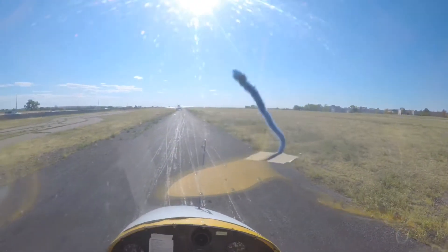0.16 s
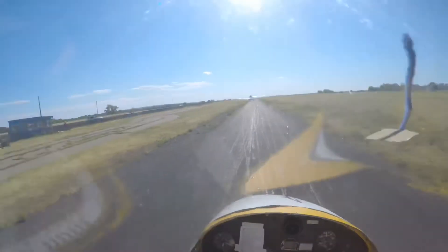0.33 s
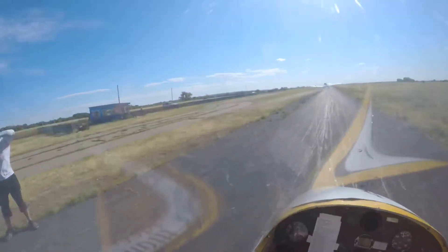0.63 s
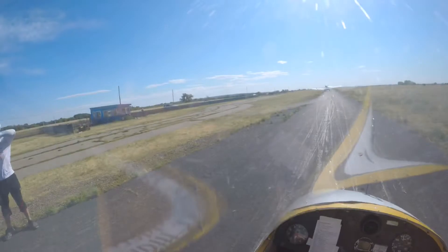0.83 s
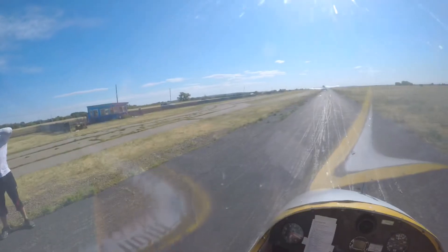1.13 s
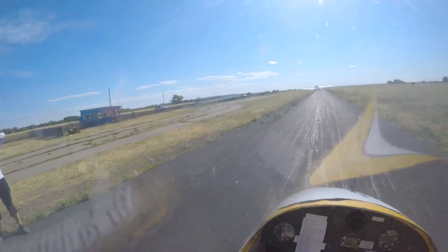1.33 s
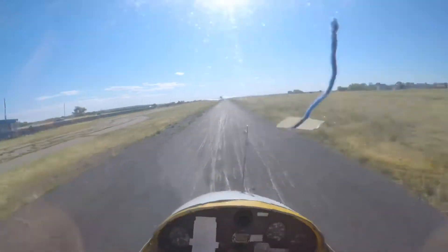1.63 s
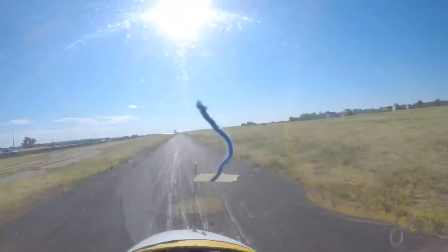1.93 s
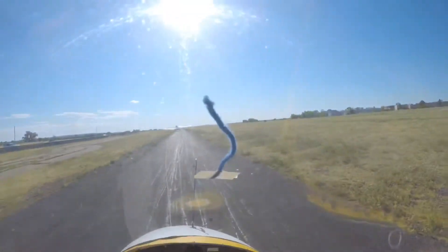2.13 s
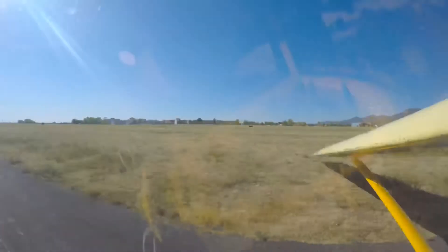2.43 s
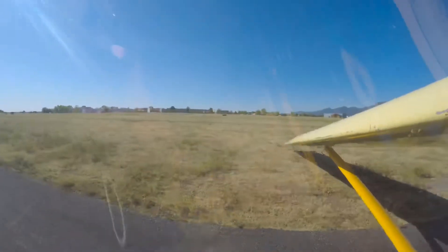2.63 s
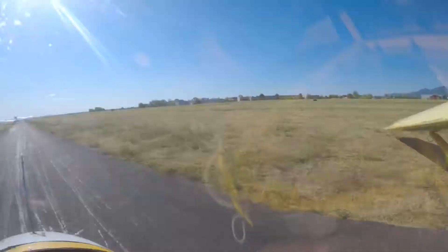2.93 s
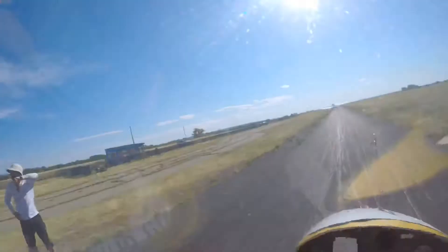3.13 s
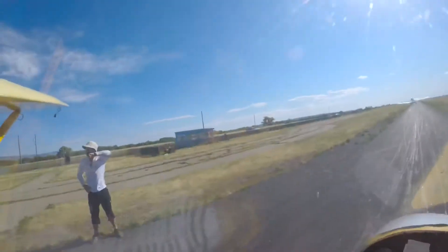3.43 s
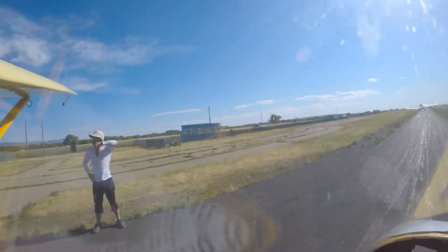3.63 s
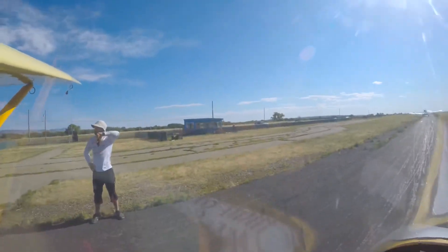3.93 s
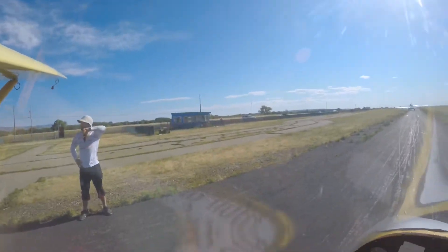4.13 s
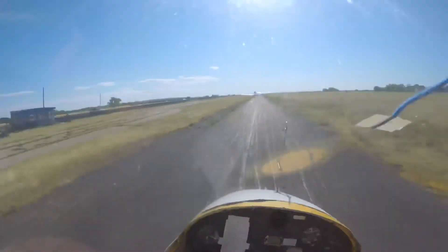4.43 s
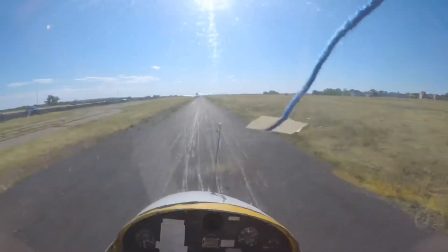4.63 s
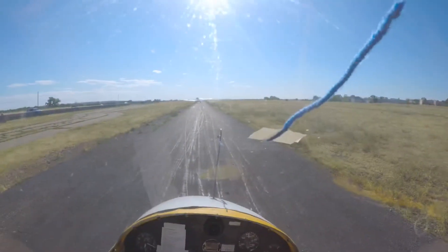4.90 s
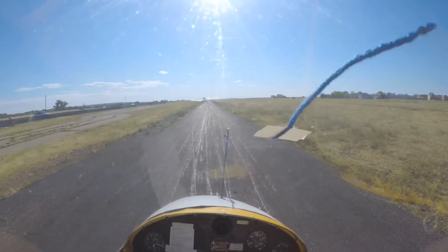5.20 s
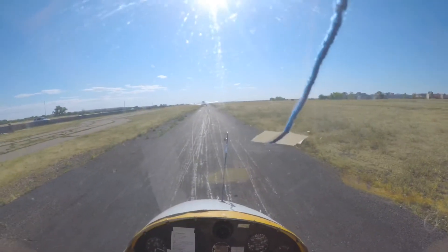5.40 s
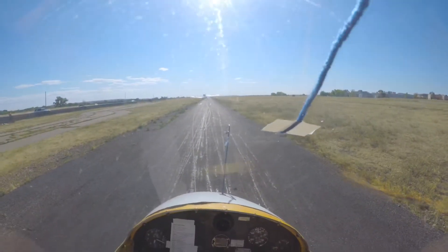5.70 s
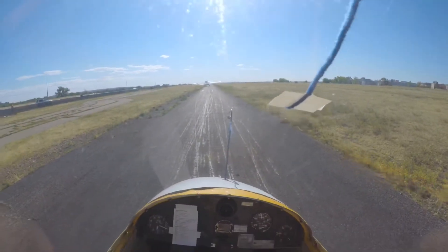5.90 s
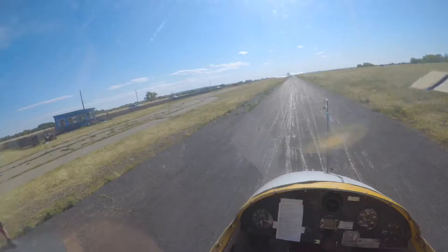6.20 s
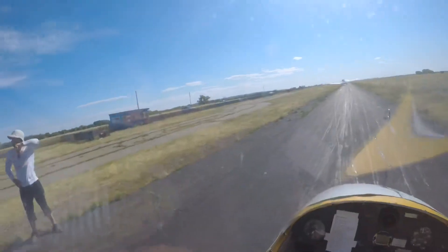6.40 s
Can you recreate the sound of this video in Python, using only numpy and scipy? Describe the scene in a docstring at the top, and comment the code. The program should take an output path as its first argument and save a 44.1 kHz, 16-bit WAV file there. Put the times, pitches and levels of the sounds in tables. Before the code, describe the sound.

Inside a light glider's cabin as it rolls along a runway, close and dry. Throughout, a deep uneven rumble sways below a wavering drone near 53 Hz that throbs three or four times a second, with very faint air hiss and tiny fittings chattering. Small hollow rattles at 0.45-0.55 s lead into a heavy booming knock at 0.6 s, with a rough swish after it. Rattles cluster from 1.1 s; at 1.4 s a metal fitting clanks and bounces briefly, with a short hiss. Scattered woody rattles follow between 1.55 and 3.6 s. At 3.8 s quick touches become the hardest, brightest slam; loose metal jangles for a moment and grainy, sliding hiss trails until about 4.6 s. Double rattles come at 4.65 s, then frequent hollow clatters from 5.25 to 6.4 s as the rumble continues to the end.

```python
"""Inside the cockpit of a light glider as it starts to roll along a runway.
Throughout: filtered-noise rumble, a throbbing drone, faint hiss of air, and rattles of tiny contacts.
At 0.6 s a heavy knock (clicks, buzz, decaying modes); at 1.4 s a metal fitting clanks and bounces.
At 3.8 s the hardest knock, after which a loose metal part jangles.
Grainy swishes of hiss come and go, some around the hard knocks; noise through moving resonances glides."""
import sys
import numpy as np
from scipy import signal
from scipy.fft import rfft, irfft
from scipy.io import wavfile
from scipy.ndimage import uniform_filter1d

SR = 44100
rng = np.random.default_rng(int(sys.argv[2]) if len(sys.argv) > 2 else 0)


def transcribe(u):
    """Save the signal u as a 16-bit wav file named by the first command-line argument.

    u: samples, shape (n,) or (channels, n), limited to [-1, 1]; the rate is SR.
    q: integer samples, one column per channel.
    """
    v = np.clip(np.atleast_2d(u).T, -1, 1)
    q = np.round(v * 32767).astype(np.int16)
    wavfile.write(sys.argv[1], SR, q)


N = 288855
TIME = np.arange(N) / SR


def gain_of(db):
    """Decibels to amplitude."""
    return 10 ** (np.asarray(db) / 20)


def evened(x):
    """Scales to rms 1."""
    return x / np.sqrt(np.mean(x ** 2) + 1e-20)


def levelled(x, size=600):
    """Scales a burst so that its loudest stretch of size samples has rms 1."""
    return x / np.sqrt(uniform_filter1d(x ** 2, size).max() + 1e-20)


def read(points, hz):
    """Reads a spectrum on a log-frequency axis."""
    f, value = np.transpose(points)
    return np.interp(np.log(hz + 1), np.log(f + 1), value)


def add(mix, s, sound):
    """Mixes a sound in at s seconds."""
    part = mix[max(round(s * SR), 0):][:len(sound)]
    part += sound[:len(part)]


def band(x, lo_hz, hi_hz, order=3):
    """Causal band-pass."""
    sos = signal.butter(order, [lo_hz, min(hi_hz, SR / 2 - 1)], "band", fs=SR, output="sos")
    return signal.sosfilt(sos, x)


def noise(spectrum):
    """Noise of rms 1 with the given spectrum."""
    gain = gain_of(read(spectrum, np.fft.rfftfreq(N, 1 / SR)))
    return evened(irfft(rfft(rng.standard_normal(N)) * gain, N))


def drift(rate_hz):
    """Random drift of rms 1: noise under a Gaussian low-pass."""
    gain = np.exp(-(np.fft.rfftfreq(N, 1 / SR) / rate_hz) ** 2)
    return evened(irfft(rfft(rng.standard_normal(N)) * gain, N))


def decay(t, t60):
    """Exponential decay by 60 dB in t60 seconds."""
    return np.exp(-np.log(1000) * t / t60)


def ringing(modes, pitch=1, size=22050):
    """A struck part rings as a sum of decaying sine modes."""
    t = np.arange(size) / SR
    return sum(gain_of(db) * decay(t, t60) * np.sin(2 * np.pi * pitch * hz * t) for hz, db, t60 in modes)


def resonate(x, hz, width_hz):
    """A resonance of gain 1 that can follow a moving frequency."""
    turn = np.exp(2j * np.pi * np.cumsum(hz * np.ones(len(x))) / SR)
    r = np.exp(-np.pi * width_hz / SR)
    # shift down to 0 Hz, one-pole low-pass, shift back up
    return 2 * (turn * signal.lfilter([1 - r], [1, -r], x / turn + 1e-18)).real


def shower(per_s, rise_s, t60):
    """Tiny contacts of random sign that build up and die away."""
    t = np.arange(SR // 3) / SR
    hits = rng.choice([-1, 1], len(t)) * (rng.random(len(t)) < per_s / SR)
    return hits * (1 - np.exp(-t / rise_s)) * decay(t, max(t60, .01))


# Modes of frame and canopy. Each row: frequency in Hz, relative level in dB, t60 in seconds.
FRAME_MODES = [(300, 10.5, 0.12), (516, 11.5, 0.45), (622, 23.5, 0.082), (783, -5, 0.063), (1250, 5, 0.1),
               (1520, -17, 0.24), (1700, 3, 0.2), (2400, -14, 0.084), (3880, 3, 0.071), (5050, -48, 0.074),
               (6030, -2, 0.045), (7940, -20, 0.045)]


def click(spectrum, ring_db, size=8192):
    """One contact: a minimum-phase click of the given colour, with the frame modes ringing after it."""
    log_gain = np.log(gain_of(read(spectrum, abs(np.fft.fftfreq(size, 1 / SR)))))
    tick = np.fft.ifft(np.exp(np.conj(signal.hilbert(log_gain)))).real
    t = np.arange(size) / SR
    ring = sum(gain_of(db) * decay(t, t60) * np.cos(2 * np.pi * hz * t) for hz, db, t60 in FRAME_MODES)
    return evened(tick) + gain_of(ring_db) * evened(ring)


# Colour of the rolling hull. Each row: frequency in Hz, relative density in dB per Hz.
RUMBLE_SPECTRUM = [(10, -11.5), (22, 8.5), (38, 8.5), (45, -1.5), (66, 6.5), (83, -7.5), (98, 1.5),
                   (120, 2.5), (150, -1.5), (175, -12.5), (260, -19), (450, -29), (900, -39), (2500, -61)]
# Strength of the rumble. Each row: time in seconds, deep sway in dB, drumming of the shell in dB.
ROLL_LEVELS = [(0.0, -31.5, -31), (0.17, -24.5, -31.5), (0.38, -33.5, -32.5), (0.66, -19.5, -32.5),
               (0.86, -32.5, -32.5), (1.03, -29, -34), (1.15, -25, -27.5), (1.31, -26, -28),
               (1.5, -34, -30.5), (1.71, -24.5, -29.5), (1.85, -30, -28.5), (2.15, -26.5, -30),
               (2.62, -29.5, -30), (2.88, -24.5, -31.5), (3.43, -30.5, -30.5), (3.68, -27, -32.5),
               (3.96, -29.5, -30), (4.3, -39.5, -34), (4.41, -36, -35.5), (4.48, -32, -30.5),
               (5.1, -28.5, -31), (5.55, -32.5, -30.5), (6.03, -27.5, -30.5), (6.55, -31, -31.5)]
BUMP_DB, BUMP_RISE_S, BUMP_FADE_S = 3, 0.0044, 0.032


def rumble(split_hz=86, lurch_db=1.0, lump_db=1.27):
    """The wheel shakes the hull: a deep sway, and a shell that drums in lumps and harder at each bump."""
    s, sway_db, drum_db = np.transpose(ROLL_LEVELS)
    # each bump that sets off a rattle
    bumps = sum(np.clip((TIME - at) / BUMP_RISE_S, 0, 1) * np.exp(-abs(TIME - at) / BUMP_FADE_S)
                for at, *_ in RATTLE_EVENTS)
    shake = noise(RUMBLE_SPECTRUM)
    low = signal.sosfiltfilt(signal.butter(4, split_hz, fs=SR, output="sos"), shake)
    sway_level_db = np.interp(TIME, s, sway_db) + lurch_db * drift(rate_hz=8.2)
    drum_level_db = np.interp(TIME, s, drum_db) + BUMP_DB * bumps + lump_db * drift(rate_hz=16)
    return evened(low) * gain_of(sway_level_db) + evened(shake - low) * gain_of(drum_level_db)


# Modes of the frame's woody knock. Each row: mean frequency in Hz, mean relative level in dB, t60 in seconds.
WOOD_MODES = [(318, 2.5, 0.12), (416.3, -1.5, 0.14), (527, -1.5, 0.09), (642, -5, 0.11), (759, -8.5, 0.082),
              (890, -13, 0.08)]


def woody(rise_s=0.004, vary_db=3.5, detune=0.029):
    """A hollow knock of the frame; each spot that is hit rings a little differently."""
    t = np.arange(SR // 4) / SR
    ring = np.zeros(len(t))
    for hz, db, t60 in WOOD_MODES:
        level = gain_of(db + vary_db * rng.standard_normal())
        spot_hz = hz * (1 + detune * rng.standard_normal())
        ring += level * decay(t, t60) * np.sin(2 * np.pi * (spot_hz * t + rng.random()))
    return levelled(ring * (1 - np.exp(-t / rise_s)))


# Each row: start in seconds, strength in dB, then hollow body and bright edge in dB re strength,
# t60 of the burst in seconds, note of the loose part in Hz, top of the edge in Hz,
# woody knock in dB re strength. All levels are before the layer trims of rattles().
RATTLE_EVENTS = [(0.437, -43, -6, -30, 0.05, 600, 4000, -0.5),
                 (0.463, -37, 5.5, -18.5, 0.098, 1020, 4500, 3),
                 (0.534, -23, -1.5, -20, 0.16, 704, 12000, -1),
                 (1.128, -29.5, 4.5, -22.5, 0.071, 1000, 8500, -5),
                 (1.170, -32.5, 5.5, -13.5, 0.16, 1490, 9500, -14),
                 (1.19, -35, -4, -22, 0.07, 800, 7000, 8.5), (1.261, -32, 2, -8.5, 0.13, 570, 11000, -3),
                 (1.316, -49, -7, -3.5, 0.73, 1400, 9000, -10),
                 (1.387, -37.5, -5, -2, 0.089, 2400, 6440, -20),
                 (1.412, -20, -10, -16.5, 0.09, 1260, 6170, -15),
                 (1.429, -29, 0.5, -16, 0.11, 930, 6300, -8),
                 (1.562, -42.5, 9, -22, 0.054, 1450, 6000, -10),
                 (1.821, -27, 7, -19.5, 0.13, 730, 9900, -5.5),
                 (1.925, -38.5, 5, -33, 0.079, 1180, 7000, -2),
                 (2.037, -36.5, -16, -16, 0.045, 1000, 5500, -16),
                 (2.262, -26.5, 2, -24, 0.085, 700, 11000, -9),
                 (2.723, -39, 5, -11.5, 0.075, 650, 9000, -6),
                 (3.104, -44.5, -5, -13.5, 0.2, 900, 9000, -2), (3.207, -33, 6, -25, 0.048, 700, 10000, -6),
                 (3.569, -40.5, -6, -11, 0.063, 1400, 9500, -6),
                 (3.83, -23, -1.5, -21.5, 0.033, 1600, 14000, -1),
                 (4.638, -27, 3, -16.5, 0.15, 2150, 6850, 3), (4.705, -27, 3, -17.5, 0.092, 1800, 9950, 1),
                 (4.918, -44, -12, -12, 0.069, 1400, 9000, -10),
                 (5.25, -41.5, -2, -11.5, .22, 1410, 9500, -10),
                 (5.318, -37, 3, -17, 0.13, 900, 8500, -3.5), (5.346, -39.5, 8.5, -21, 0.2, 900, 8500, -5),
                 (5.535, -41, 12, -17, 0.2, 1390, 9000, -10), (5.597, -35, 8.5, -23, 0.05, 650, 9000, -2),
                 (5.719, -31, 8.5, -22, 0.1, 700, 9000, -2),
                 (5.807, -31.5, -7, -21.5, 0.071, 650, 9000, -15),
                 (5.93, -28.5, 5.5, -19.5, 0.064, 680, 12000, -6.5),
                 (6.198, -27.5, 3.5, -19.5, 0.11, 675, 11000, -7.5),
                 (6.357, -32.5, 11.5, -16.5, 0.083, 2020, 12000, -5)]
# Colour of a rattle. Each row: frequency in Hz, relative density in dB per Hz.
CLATTER_SPECTRUM = [(60, -36), (130, 10.5), (200, 10.5), (290, 2), (450, 0.5), (700, 5.5), (1400, 1),
                    (2200, -0.5), (3200, -14), (4500, -17.5), (5900, -17), (7200, -18.5), (9000, -19.5),
                    (15500, -33)]
SETTLE_T60_S, SETTLE_DB = 0.17, -13  # softer chatter after each rattle
FIRM_DB, FIRM_RISE_S, RISE_DOUBLES_DB = -28, 0.00566, 28.5  # weaker rattles start more softly


def rattles(clatter_db=-12.0, body_db=-4, edge_db=-2, wood_db=-8.0, body_hz=390, edge_hz=2800,
            note_db=-5, note_width_hz=300, shell_hz=195, shell_width_hz=35, shell_db=9):
    """A loose part chatters on the frame, knocks on it, rings its own note and sets the hollow shell going."""
    out = np.zeros(N)
    contact = click(CLATTER_SPECTRUM, ring_db=-5.5)
    for s, strength, body, edge, t60, note_hz, top_hz, wood in RATTLE_EVENTS:
        rise_s = FIRM_RISE_S * 2 ** ((FIRM_DB - strength) / RISE_DOUBLES_DB)
        burst = shower(per_s=8000, rise_s=rise_s, t60=t60)
        settling = shower(per_s=8000, rise_s=rise_s, t60=SETTLE_T60_S)
        sound = signal.fftconvolve(burst + gain_of(SETTLE_DB) * settling, contact)
        low = band(sound, 96, body_hz)
        mid = band(sound, body_hz, edge_hz)
        high = band(sound, edge_hz, top_hz, order=2)
        low = levelled(low) + gain_of(shell_db) * levelled(resonate(low, shell_hz, shell_width_hz))
        mid = levelled(mid) + gain_of(note_db) * levelled(resonate(mid, note_hz, note_width_hz))
        add(out, s, gain_of(strength + body + body_db) * levelled(low))
        add(out, s, gain_of(strength + clatter_db) * levelled(mid))
        add(out, s + rise_s / 2, gain_of(strength + wood + wood_db) * woody())
        add(out, s, gain_of(strength + edge + edge_db) * levelled(high))
    return out


# Touches about 10 ms apart that grow into a slam. Each row: contact time in seconds, thud in dB,
# thud pitch in Hz, crack peak in dB, boom of the hull in dB, top of the crack in Hz, panel ring in dB re snap.
KNOCK_CONTACTS = [(0.602, -38, 201, -27, -45, 1500, 6), (0.6129, -21, 300, -21, -40, 2500, -6),
                  (0.625, -7.5, 108.5, -8, -8, 2200, 1.5), (3.776, -38, 202, -33, -45, 5000, 6),
                  (3.7873, -27, 185, -20, -45, 7000, -3), (3.798, -6.5, 134.5, -10.5, -30, 9000, 17),
                  (3.8086, -4.5, 150.3, -0.5, -27, 14000, -2.5)]
# Colour of the crack. Each row: frequency in Hz, relative density in dB per Hz.
CRACK_SPECTRUM = [(60, -5), (220, 31), (340, 25.5), (520, 22.5), (700, -7), (880, 9.5), (1150, -0.5),
                  (1600, 9), (2300, 0.5), (3200, -1.5), (4100, 0.5), (5900, -0.5), (7200, -35), (8700, -16),
                  (10500, -24), (15000, -45)]
# Modes of the panel that is hit. Each row: frequency in Hz, relative level in dB, t60 in seconds.
PANEL_MODES = [(339, 2, 0.079), (434, 4, 0.036), (1046, -2.5, 0.018), (900, -6.5, 0.042),
               (1520, 2.5, 0.017), (1810, -23, 0.031), (2470, -25, 0.053), (5430, -15, 0.018),
               (6030, -18, 0.05), (8650, -24.5, 0.04)]
# Modes of the thud. Each row: multiple of the thud pitch, level in dB re thud, t60 in seconds.
THUD_MODES = [(.48, -3, 0.13), (1, 3, 0.056), (1.55, -14, 0.067), (2.2, -9.5, 0.075), (3.3, -7.5, 0.051)]


def knocks(boom_hz=34, boom_t60=0.26, buzz_db=-8, buzz_t60=0.033, graze_db=-12, graze_t60=0.042):
    """Each contact: a graze, a ringing crack, a brief buzz of the joints, a shell thud and a hull boom."""
    out = np.zeros(N)
    snap = click(CRACK_SPECTRUM, ring_db=-44)
    ring = evened(ringing(PANEL_MODES, size=len(snap)))
    for s, thud_db, thud_hz, crack_db, boom_db, top_hz, panel_db in KNOCK_CONTACTS:
        crack = band(snap + gain_of(panel_db) * ring, 36, top_hz, order=1)
        buzz = signal.fftconvolve(shower(per_s=2200, rise_s=0.0018, t60=buzz_t60), crack)
        # reversed shower: contacts swell up to the blow
        approach = shower(per_s=3000, rise_s=0.00056, t60=graze_t60)[::-1]
        graze = signal.fftconvolve(approach, crack)
        add(out, s - len(approach) / SR, gain_of(crack_db + graze_db) * graze / abs(graze).max())
        add(out, s, -gain_of(crack_db) * crack / abs(crack).max())
        add(out, s, gain_of(crack_db + buzz_db) * buzz / abs(buzz).max())
        add(out, s, gain_of(thud_db) * ringing(THUD_MODES, thud_hz))
        add(out, s, ringing([(boom_hz, boom_db, boom_t60)]))
    return out


# Modes of the loose metal part. Each row: frequency in Hz, width of each resonator pass in Hz, level in dB.
JANGLE_MODES = [(335, 110, -36), (1560, 290, -45), (4200, 400, -54), (5000, 700, -56), (5750, 450, -53),
                (6350, 600, -59), (8900, 990, -63), (11900, 1500, -62)]
JANGLE_S, JANGLE_LENGTH_S = 3.832, 0.018


def jangle(per_s=900, release_s=0.035):
    """A loose metal part keeps bouncing after the hardest knock, and each bounce rings its modes."""
    age = TIME - JANGLE_S
    held = (age > 0) * np.exp(-np.maximum(age - JANGLE_LENGTH_S, 0) / release_s)
    bounces = held * rng.standard_normal(N) * (rng.random(N) < per_s / SR)
    out = np.zeros(N)
    for hz, width_hz, db in JANGLE_MODES:
        mode = resonate(resonate(bounces, hz, width_hz), hz, width_hz)
        out += gain_of(db) * levelled(mode, size=2000)
    return out


# Modes of the fitting. Each row: frequency in Hz, relative level in dB, t60 in seconds.
FITTING_MODES = [(617, -2, 0.13), (920, 1, 0.067), (1242, 3, 0.058), (1550, -7, 0.065), (2400, -18, 0.17),
                 (3429, -20, 0.1), (4813, -17, 0.067), (5310, -15, 0.069), (5787, -14, 0.092),
                 (9160, -27, 0.07)]
# Colour of the crash. Each row: frequency in Hz, relative density in dB per Hz.
CRASH_SPECTRUM = [(80, -12), (200, 0), (420, 2.5), (700, -2), (1300, -3.5), (2000, -13), (3000, -16),
                  (4200, -23), (6100, -14.5), (7000, -46), (8000, -29), (9000, -23.5), (10500, -30.5),
                  (15000, -32)]
# Contacts as the fitting bounces. Each row: time in seconds, crash level in dB.
BOUNCE_CONTACTS = [(1.3995, -21.5), (1.4065, -28.5), (1.412, -29.5), (1.4215, -30.5)]
CLANK_S, CLANK_DB = 1.3995, -22


def clank(rise_s=0.00064, crash_t60=0.031):
    """A metal fitting is struck and bounces: one ring of about 0.1 s, and a short crash at each contact."""
    out, ring = np.zeros(N), ringing(FITTING_MODES)
    onset = 1 - np.exp(-TIME[:len(ring)] / rise_s)
    add(out, CLANK_S, gain_of(CLANK_DB) * levelled(ring * onset))
    contact = click(CRASH_SPECTRUM, ring_db=-27)
    for s, db in BOUNCE_CONTACTS:
        crash = signal.fftconvolve(shower(per_s=4000, rise_s=rise_s, t60=crash_t60), contact)
        add(out, s, gain_of(db) * levelled(crash))
    return out


# Each row: start in seconds, length before release in seconds, level in dB, fade in dB per second.
SWISH_EVENTS = [(0.618, 0.24, -34, 19), (1.085, 0.36, -36, 3), (1.42, 0.14, -30, 42),
                (3.824, 0.26, -31, 26), (4.075, 0.23, -35, 10)]
# Colour of the hiss. Each row: frequency in Hz, relative density in dB per Hz.
SWISH_SPECTRUM = [(200, 22.5), (450, 9), (800, 0), (1700, -7.5), (2900, -19), (5300, -20.5), (7000, -23),
                  (10000, -30), (15000, -46)]
# Resonances of the grains. Each row: frequency in Hz, width of each resonator pass in Hz, relative level in dB.
GRAIN_MODES = [(351, 155, -7), (556, 117, -11), (835, 240, -15), (1184, 300, -16.5), (1525, 530, -20.5)]


def swishes(release_s=0.063, onset_s=0.0057, grains_db=-9, grains_per_s=260, grain_spread_db=3):
    """Rough hiss and sparse random grains through resonances that hold for a moment, then let go."""
    power = np.zeros(N)
    for s, length_s, db, fade_db_per_s in SWISH_EVENTS:
        age = np.maximum(TIME - s, 0)
        onset = 1 - np.exp(-age / onset_s)
        release = np.exp(-np.maximum(age - length_s, 0) / release_s)
        power += (gain_of(db - fade_db_per_s * age) * onset * release) ** 2
    roughness = gain_of(2.0 * drift(rate_hz=120) + 0.8 * drift(rate_hz=20))
    grains = np.zeros(N)
    for hz, width_hz, db in GRAIN_MODES:
        pulses = rng.random(N) < grains_per_s / len(GRAIN_MODES) / SR
        pulses = pulses * gain_of(grain_spread_db * (2 * rng.random(N) - 1))
        grains += gain_of(db) * evened(resonate(resonate(pulses, hz, width_hz), hz, width_hz))
    return np.sqrt(power) * (evened(noise(SWISH_SPECTRUM) * roughness) + gain_of(grains_db) * grains)


# Each row: start in seconds, length in seconds, first and last frequency in Hz,
# width of each resonator pass in Hz, starting level in dB, fade over its length in dB (negative swells).
GLIDE_BANDS = [(0.639, 0.17, 1500, 1400, 690, -50.5, 9), (0.647, 0.193, 720, 650, 450, -51, -4),
               (0.68, 0.45, 1900, 2750, 850, -59.5, 8), (0.643, 0.13, 6200, 6300, 600, -65, 6),
               (0.657, 0.11, 4770, 4450, 500, -63, 3), (1.417, 0.2, 2500, 3200, 2800, -53.5, 8),
               (1.432, 0.2, 10400, 9900, 1700, -62, 5), (1.437, 0.36, 8700, 7000, 800, -65, 5),
               (1.3, 0.69, 5600, 6900, 800, -68, 4), (2.7, 0.22, 1850, 2300, 730, -66, -4),
               (2.7, 0.2, 7200, 7500, 1800, -70, 2), (3.84, 0.57, 8800, 6700, 1500, -60.5, 13),
               (3.878, 0.64, 4670, 4900, 990, -66.5, 4), (4.4, 0.52, 5750, 6300, 1000, -72, 9),
               (3.86, 0.21, 1650, 1400, 450, -58, 6), (4.03, 0.66, 1900, 2800, 650, -59.5, 7.5),
               (4.081, 0.206, 600, 1100, 380, -50, 1), (4.1, 0.28, 1270, 1700, 400, -57, -3),
               (4.3, 0.28, 1600, 1400, 260, -64, 5), (4.17, 0.31, 264, 192, 100, -41.5, -3)]


def glides(wander=0.029):
    """Noise through moving resonances: bands of hiss that waver and slide in pitch."""
    out = np.zeros(N)
    wobble = drift(rate_hz=14)
    for s, length_s, from_hz, to_hz, width_hz, db, fade_db in GLIDE_BANDS:
        progress = np.linspace(0, 1, int(length_s * SR))
        span = rng.integers(N // 2) + np.arange(len(progress))
        hz = (from_hz + (to_hz - from_hz) * progress) * (1 + wander * wobble[span])
        hiss = rng.standard_normal(len(progress))
        hiss = resonate(resonate(hiss, hz, width_hz), hz, width_hz)
        window = signal.windows.tukey(len(hz), .15)
        add(out, s, gain_of(db - fade_db * progress) * evened(hiss) * window)
    return out


HUM_HZ, HUM_WANDER_HZ, HUM_DB = 52.9, 2.135, -29.5  # wander is rms
THROB_HZ, THROB_DB, THROB_PEAK_S = 3.55, 1.5, 5.63


def hum(waver_db=1.74, follow=0.25):
    """A low sine drone that wavers in pitch and level, throbs, and swells with the sway of the hull."""
    s, sway_db, _ = np.transpose(ROLL_LEVELS)
    swell_db = follow * np.interp(TIME, s, sway_db - np.median(sway_db))
    throb_db = THROB_DB * np.cos(2 * np.pi * THROB_HZ * (TIME - THROB_PEAK_S))
    turns = np.cumsum(HUM_HZ + HUM_WANDER_HZ * drift(rate_hz=5.97)) / SR
    level = gain_of(swell_db + throb_db + waver_db * drift(rate_hz=10))
    return gain_of(HUM_DB) * evened(np.sin(2 * np.pi * turns) * level)


def jiggle(per_s=250, level_db=-59, clump_db=1.3):
    """Small fittings chatter softly and at random all the time."""
    jolts = gain_of(clump_db * drift(rate_hz=14)) * (rng.random(N) < per_s / SR)
    contact = click(CLATTER_SPECTRUM, ring_db=-4)
    chatter = signal.fftconvolve(shower(per_s=4500, rise_s=0.016, t60=0.078), contact)
    return gain_of(level_db) * evened(signal.fftconvolve(jolts, chatter)[:N])


# Colour of the air. Each row: frequency in Hz, relative density in dB per Hz.
AIR_SPECTRUM = [(400, -11.5), (700, -6), (1400, -11), (1700, -19.5), (2900, -13.5), (4500, -18.5),
                (6300, -21), (8000, -20), (9800, -18), (11200, -24), (13300, -34), (15300, -58)]


def air(level_db=-60.5, flutter_db=0.4):
    """Faint hiss around the canopy: filtered noise with a slight flutter in level."""
    return gain_of(level_db) * noise(AIR_SPECTRUM) * gain_of(flutter_db * drift(rate_hz=43.0))


def scene():
    """Everything heard from the pilot's seat."""
    rolling = rumble() + rattles()
    blows = knocks() + jangle() + clank()
    hisses = swishes() + glides()
    background = hum() + jiggle() + air()
    return (rolling + blows + hisses + background)[None]


def record(dry, dull_hz=13000, edge_hz=15400):
    """The microphone rounds off the hardest blows and dulls the top octave; then the band limit."""
    rounded = dry / (1 + (dry / .93) ** 6) ** (1 / 6)
    dulled = signal.sosfilt(signal.butter(3, dull_hz, fs=SR, output="sos"), rounded)
    band_limit = signal.firwin(511, edge_hz, window=("kaiser", 9), fs=SR)
    return signal.oaconvolve(dulled, band_limit[None], "same")


dry = scene()
out = record(dry)
transcribe(out)
```